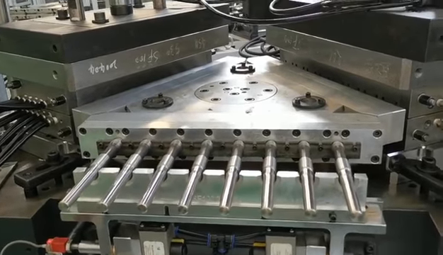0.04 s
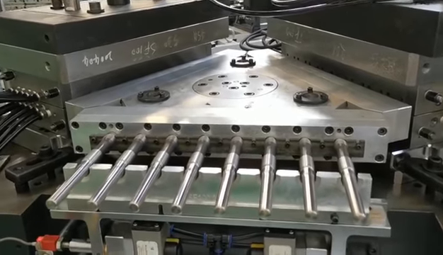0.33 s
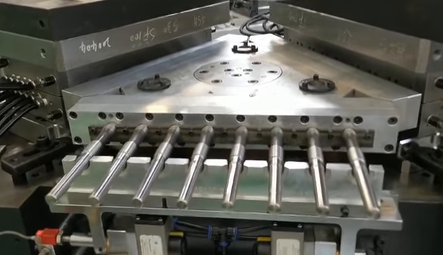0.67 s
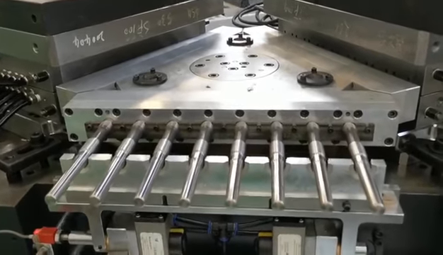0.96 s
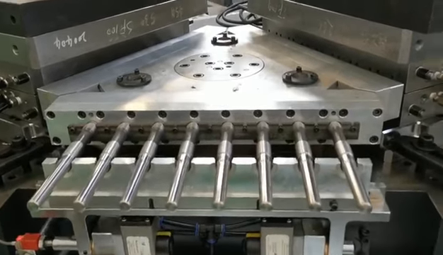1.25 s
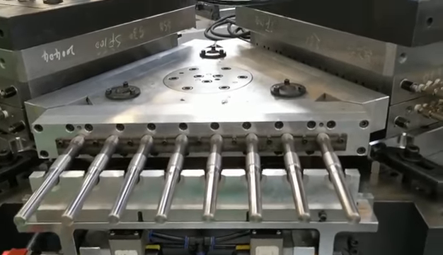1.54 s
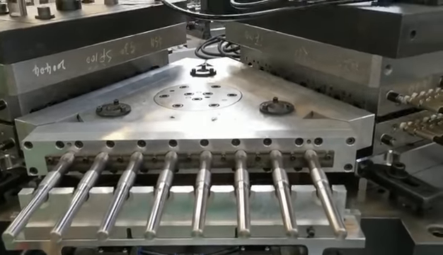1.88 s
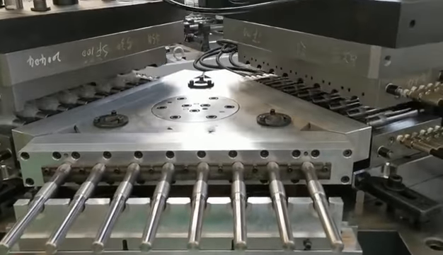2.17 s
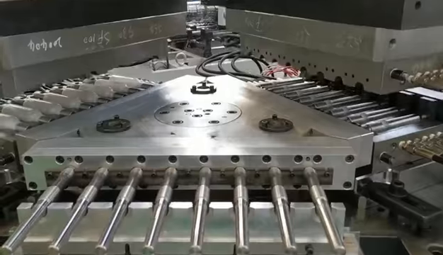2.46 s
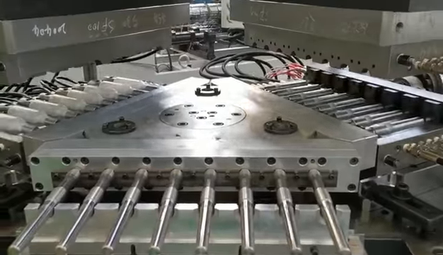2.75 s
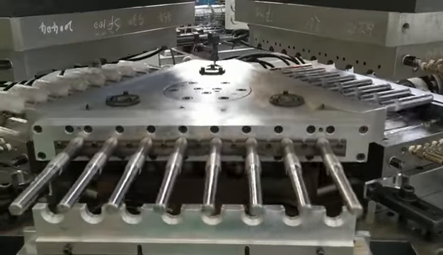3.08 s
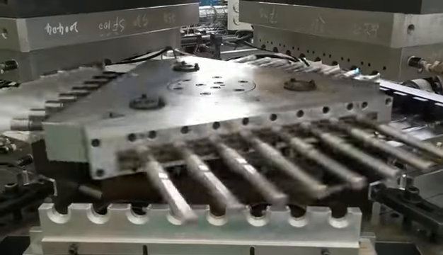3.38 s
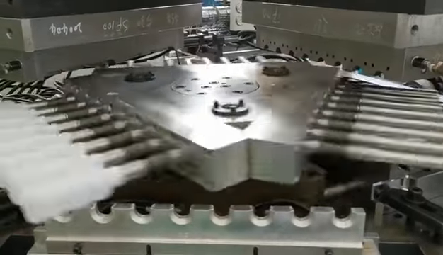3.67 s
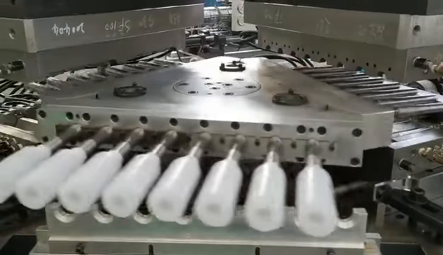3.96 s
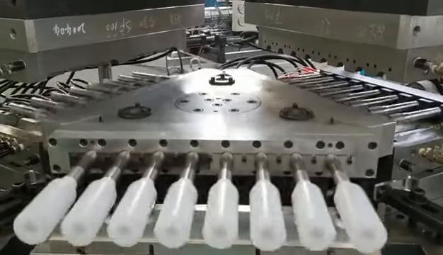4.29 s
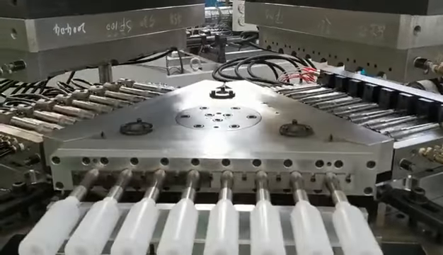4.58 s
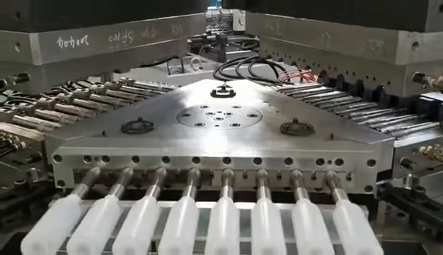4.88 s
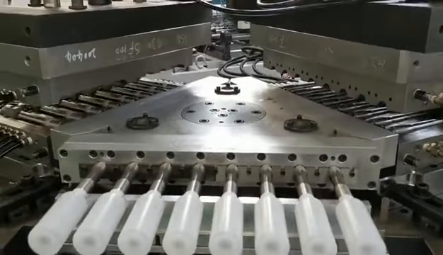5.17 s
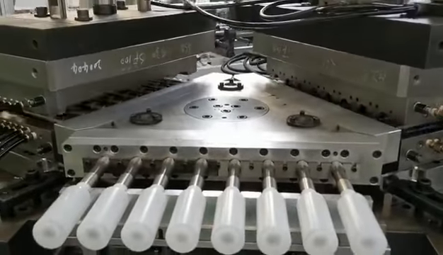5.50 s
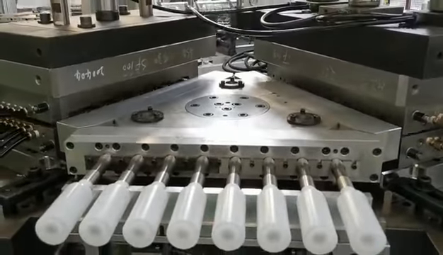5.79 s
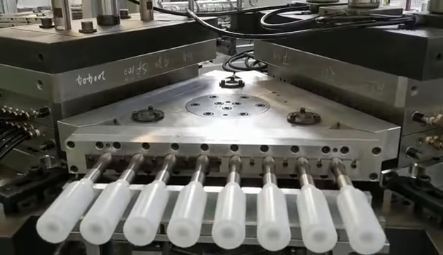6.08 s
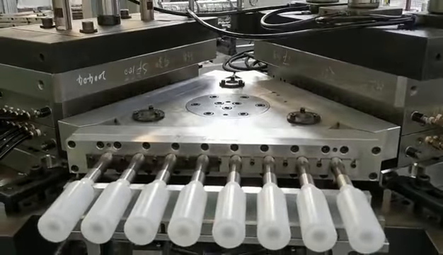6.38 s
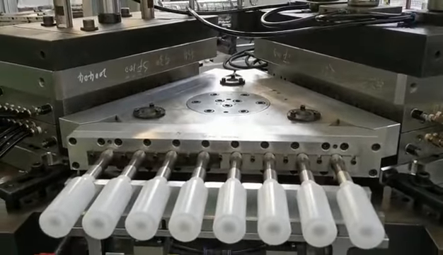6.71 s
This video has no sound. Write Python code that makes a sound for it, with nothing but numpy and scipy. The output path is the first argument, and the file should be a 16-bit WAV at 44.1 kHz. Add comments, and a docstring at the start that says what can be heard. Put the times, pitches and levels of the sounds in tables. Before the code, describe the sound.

A plastic bottle molding machine runs one cycle, heard up close in an echoing factory hall. A hydraulic pump hums under a short hiss, then the molds part with dull, juddering thuds. A loud, high burst of compressed air follows, and a steel turret turns with rattles and knocks before landing with a clunk. Near the end the molds clang shut, ringing briefly, over the steady drone of other machines.

```python
"""Factory floor: an injection blow moulding machine runs one cycle.
The moulds part with dull thuds, valves dump compressed air, and the turret turns and drops onto its seat.
The moulds clang shut and set the steel frame ringing. Latches click and loose tooling rattles.
The hydraulic pump hums under load; behind it are distant machines, motors, leaks and the hall's echo."""
import sys
import numpy as np
from scipy import signal
from scipy.fft import rfft, irfft, next_fast_len
from scipy.io import wavfile

SR = 44100
rng = np.random.default_rng(int(sys.argv[2]) if len(sys.argv) > 2 else 0)


def generate_wav(signal):
    """Clip the signal to [-1, 1] and save it as 16-bit WAV at the path in sys.argv[1]."""
    frames = np.transpose(np.atleast_2d(signal))
    scaled = np.clip(frames, -1, 1) * 32767
    pcm = np.round(scaled).astype(np.int16)
    wavfile.write(sys.argv[1], SR, pcm)


N = 297234
TIME = np.arange(N) / SR
NOISE_TOP_HZ = 7560


# start_s, level_db, bright_hz, pan_db, frame_share, knock_hz, knock_db, t60_scale
STEEL_LANDINGS = [(1.906, -20, 700, -6, 0, 330, -8, 0.82), (2.955, -28, 700, 1, 0.12, 726, 0.5, 0.76),
                  (3.272, -25, 1500, 0.5, 0.12, 298, 1, 1.2), (3.336, -29.5, 2500, 4, 0, 393, -7, 2.2),
                  (4.273, -30, 1400, -5, 0.2, 494, 0, 3), (4.286, -25, 1400, -5, 0.15, 920, -2, 1.5),
                  (4.418, -26, 3000, 0, 0.07, 1110, -8, 1.3), (4.6343, -15, 1600, -2, 0.22, 629, 2, 1.02),
                  (5.9535, -15.5, 885, -3, 0.46, 603, -1, 1.94),
                  (6.0204, -9.5, 4200, -2.5, 0.3, 1263, -8, 0.76),
                  (6.039, -17.5, 1200, 6, 0.2, 332, 5.5, 1.7),
                  (6.197, -19.5, 2100, -1, 0.69, 522, 0.5, 1.6)]
# pitch_ratio, level_db, t60_scale
KNOCK_MODES = [(1, 1.5, 1), (1.48, -7, .8), (2.3, -14.5, 0.61)]
# freq_hz, density_db
TOOLING_SPECTRUM = [(60, -19.5), (150, -4), (350, 1), (750, 0.5), (950, -11.5), (1250, -4), (1700, -12),
                    (2900, -8.5), (4200, -18), (7500, -22.5)]
# freq_hz, t60_s
TOOLING_DECAY = [(100, 0.29), (400, 0.25), (1000, 0.15), (2200, 0.19), (4000, 0.11), (7500, 0.2)]
# pitch_hz, level_db, t60_s
FRAME_MODES = [(119.3, -27, 1), (223, -30, 0.82), (246.7, -10, 0.3), (294.7, -11, 0.93), (314, -27, 0.87),
               (341, -5, 0.49), (364, -21, 0.86), (415, -21, 0.87), (421.8, -7.5, 0.82), (522, -5, 0.46),
               (615, -12, 0.55), (636, -2.5, 0.35), (768, -15.5, 1), (1050, -21, 0.95), (1145, -17, 0.5),
               (1360, -31.5, 0.18), (1450, -18.5, 0.16), (1960, -34, 0.23), (1875, -25.5, 0.46),
               (1820, -22, .3), (2360, -19, .35), (2450, -19, 0.37), (2600, -30, .3), (2530, -22.5, 0.23),
               (2960, -33, 0.11), (4400, -25.5, 0.29)]

def clunks(ring_db=-2, knock_t60_s=0.054):
    """Steel on steel: a solid knock, a crash of dense tooling modes, a ringing frame."""
    out = np.zeros((2, N))
    edges_hz = np.geomspace(60, 9000, 8)
    for start_s, db, bright_hz, pan_db, frame_share, knock_hz, knock_db, t60_scale in landings():
        knock = sum(from_db(knock_db + mode_db) * mode(knock_hz * ratio, knock_t60_s * scale, 0.22)
                    for ratio, mode_db, scale in KNOCK_MODES)
        dense = rms_one(filtered(noise(TOOLING_SPECTRUM, size=SR), bright_hz, "low", order=1))
        crash = np.zeros((2, SR))
        for low_hz, high_hz in zip(edges_hz, edges_hz[1:]):
            band_t60_s = t60_scale * at_hz(TOOLING_DECAY, np.sqrt(low_hz * high_hz))
            crash += filtered(dense, [low_hz, high_hz], "band") * decay(band_t60_s)
        ring = np.zeros((2, SR))
        for hz, mode_db, t60_s in FRAME_MODES:
            gain = from_db(mode_db + 0.42 * rng.normal()) * rng.choice([-1, 1])
            ring += gain * mode(hz, t60_s, skew_rad=0.25)
        blow = (knock + crash) * panned(pan_db) + from_db(ring_db) * frame_share * ring
        add(out, start_s, from_db(db) * blow)
    return out


def landings(settle_s=0.01, settle_db=-10, pitch_ratio=0.6):
    """Each part lands, then settles with a softer, lower knock."""
    for start_s, db, bright_hz, pan_db, share, knock_hz, knock_db, t60_scale in STEEL_LANDINGS:
        for delay_s, drop_db, ratio in ((0, 0, 1), (settle_s, settle_db, pitch_ratio)):
            yield (start_s + delay_s, db + drop_db, bright_hz, pan_db, share,
                   knock_hz * ratio, knock_db, t60_scale)


# freq_hz, density_db
SILENCER_SPECTRUM = [(1200, -34.5), (2000, -16.5), (2700, -12.5), (3600, -2.5), (4450, -4), (4750, -12),
                     (5450, -11.5), (5800, -17), (7500, -18)]
# pitch_hz, width_hz, level_db
SILENCER_CAVITY = [(4456, 150, 8), (3930, 300, -11), (2860, 21, -14)]

def turret_exhaust():
    """Air dumps as the turret starts; the silencer cavity gives it a pitch."""
    jet = noise(SILENCER_SPECTRUM)
    cavity = sum(from_db(db) * resonance(jet, hz, width_hz) for hz, width_hz, db in SILENCER_CAVITY)
    flow = air_dump(peak_s=2.977, rise_s=0.13, burst_db=-20, flow_db=-30.5, hold_s=0.37, t60_s=2.5)
    return rms_one(jet + cavity) * flow * from_db(0.45 * drift(30)) * panned(-9.5)


# freq_hz, density_db
VENT_SPECTRUM = [(700, -19.5), (1500, -7), (2400, -1), (3400, -1), (4300, -2.5), (5550, 5.5), (5900, -4),
                 (7500, -5)]

def mould_exhaust():
    """Compressed air hisses out of the moulds."""
    flow = air_dump(peak_s=0.063, rise_s=3, burst_db=-26, flow_db=-37, hold_s=0.2, t60_s=1.5)
    return noise(VENT_SPECTRUM) * flow * from_db(0.25 * drift(30)) * panned(-5)


def air_dump(peak_s, rise_s, burst_db, flow_db, hold_s, t60_s):
    """Valve envelope: a brief overpressure on a flow that fades as the line empties."""
    burst = from_db(burst_db) * swell(peak_s, rise_s=0.035, hold_s=0, t60_s=0.19)
    return burst + from_db(flow_db) * swell(peak_s, rise_s, hold_s, t60_s)


# start_s, level_db, rise_s, t60_s, pan_db
VALVE_PUFFS = [(0.777, -23, 0.0032, 0.091, -3), (1.906, -33, 0.0041, 0.49, -8),
               (1.929, -28.5, 0.006, 0.071, -5), (3.268, -31.5, 0.0056, 0.28, -3),
               (4.262, -36, 0.011, 0.2, -11.5), (4.415, -25, 0.011, 0.15, -4),
               (4.631, -25.5, 0.0051, 0.074, -3), (5.94, -32, 0.019, 0.16, -7.5)]
# freq_hz, density_db
PUFF_SPECTRUM = [(300, 3.5), (900, 10.5), (2000, 7.5), (4000, 7.5), (5400, 3), (5900, -4), (7500, -1)]

def valve_puffs():
    """Valves release short puffs of air."""
    out = np.zeros((2, N))
    for start_s, db, rise_s, t60_s, pan_db in VALVE_PUFFS:
        fall = np.minimum(decay(t60_s) * from_db(60 * rise_s / t60_s), 1)
        puff = attack(rise_s) * fall * noise(PUFF_SPECTRUM, size=SR)
        add(out, start_s, from_db(db) * puff * panned(pan_db))
    return out


# start_s, level_db, pitch_hz, t60_s
HEAVY_THUDS = [(0.055, -23, 67.5, 0.15), (1.59, -23, 135, 0.47), (1.629, -26, 70.4, 0.41),
               (1.984, -24, 61.4, 0.6), (3.268, -28, 151.4, 0.5), (4.288, -26.5, 163.4, 0.19),
               (4.72, -28.5, 130.7, 0.57), (5.566, -28.5, 74.5, 0.4), (5.955, -22, 140, 0.33)]

def thuds(rumble_db=-9, rumble_hz=330, rise_s=0.0039):
    """Soft blows of heavy parts: one damped mode plus low rumble."""
    out = np.zeros((2, N))
    for start_s, db, hz, t60_s in HEAVY_THUDS + judders():
        rumble = rms_one(filtered(noise(OIL_SPECTRUM, size=SR), rumble_hz, "low")) * decay(t60_s)
        body = mode(hz, t60_s, skew_rad=0.81) + from_db(rumble_db) * rumble
        add(out, start_s, from_db(db) * body * attack(rise_s))
    return out


# start_s, level_db, pitch_hz, t60_s, thud_count, loss_per_thud_db
JUDDER_RUNS = [(1.876, -15.5, 132.3, 0.15, 6, 0.1), (2.888, -8, 141, 0.089, 4, 2.5)]

def judders(gap_s=0.0262, pitch_spread=0.07):
    """Stick-slip as a part breaks free: rows for an even run of weakening thuds."""
    return [(start_s + k * gap_s, db - k * loss_db, hz * (1 + pitch_spread * rng.normal()), t60_s)
            for start_s, db, hz, t60_s, count, loss_db in JUDDER_RUNS for k in range(count)]


# start_s, end_s, load_ratio
PUMP_STROKES = [(-0.4, 0.189, 1.2), (0.134, 1.503, 0.95), (5.867, 6.904, 0.85)]
# harmonic, no_load_db, load_gain_db
PUMP_TONES = [(2, -48.5, 6.5), (3, -65.5, 5.5), (4, -59, 6.5), (5, -58, 9.5), (6, -57, 12.5), (7, -68, 6),
              (8, -58.5, 10), (9, -54.5, 3), (11, -64, 10.5), (12, -63, 14.5), (14, -58.5, 8)]
# freq_hz, density_db
OIL_SPECTRUM = [(25, -3.5), (60, -7), (110, -1), (190, 2.5), (300, -5.5), (600, -6.5), (720, -12),
                (1000, -13), (1350, -12.5), (1600, -22), (2900, -22.5), (5000, -22.5), (7500, -30.5)]

def pump(no_load_hz=99.5, sag=0.008, idle_load=0.0595, rise_s=0.26, fall_s=0.234):
    """Load slows the pistons slightly, raises the hum and drives oil through the valves."""
    strokes = sum(peak * np.clip(np.minimum((TIME - start_s) / rise_s, (end_s - TIME) / fall_s), 0, 1)
                  for start_s, end_s, peak in PUMP_STROKES)
    load = np.maximum(strokes, idle_load)
    piston_hz = no_load_hz * (1 - sag * load)
    hum = sum(from_db(db + load * load_db) * tone(k * piston_hz) for k, db, load_db in PUMP_TONES)
    oil = from_db(-38 + 1.3 * drift(3.3)) * load * noise(OIL_SPECTRUM, lead_s=-0.00014)
    return hum * panned(-4 * (1 - load)) + oil * panned(-2)


# start_s, level_db, pitch_hz, t60_s, pan_db
LATCH_CLICKS = [(0.781, -31, 4040, 0.028, 0), (1.284, -30, 4050, 0.03, -3), (1.809, -32, 4030, 0.031, -9),
                (1.9385, -26, 5260, 0.04, -22), (1.968, -33, 3320, 0.035, -13),
                (2.058, -25.5, 2030, 0.06, -14), (2.117, -28.5, 2930, 0.025, -18),
                (2.18, -28, 4040, 0.027, -19), (2.783, -30, 2090, 0.031, -10),
                (3.338, -31, 2064, 0.035, -2), (3.764, -30, 2160, 0.022, -17),
                (4.875, -17.5, 3706, 0.042, -10), (6.021, -18.5, 3850, 0.019, -11),
                (6.195, -22, 2880, 0.05, -12)]
# pitch_ratio, level_db, t60_scale
PIN_MODES = [(.62, -20.5, 2.1), (0.709, -34, 0.8), (1, 2.5, 1.1), (1.05, -12.5, 0.91), (1.27, -10, 0.64),
             (1.33, -6, 0.17), (1.43, -27, 0.99), (1.85, -15, 0.59), (2.172, -13, 0.42)]

def clicks(ring_db=-5.5, crack_db=-10, crack_t60_s=0.05, rebound_s=0.006, rebound_db=-5):
    """Pins and latches snap home and rebound once: a crack plus bright modes."""
    out = np.zeros((2, N))
    for start_s, db, hz, t60_s, pan_db in LATCH_CLICKS:
        for delay_s, contact_db in ((0, 0), (rebound_s * rng.uniform(1, 1.3), rebound_db)):
            ring = sum(from_db(ring_db + mode_db) * mode(hz * ratio, t60_s * scale, skew_rad=0.27)
                       for ratio, mode_db, scale in PIN_MODES)
            crack = from_db(crack_db) * noise(PUFF_SPECTRUM, size=SR) * decay(crack_t60_s)
            add(out, start_s + delay_s, from_db(db + contact_db) * (ring + crack) * panned(pan_db))
    return out


# peak_s, hold_s, level_db
TRAVEL_SPANS = [(1.945, 0.12, -36), (3.342, 0.06, -42.5), (3.5, 0.7, -50), (4.22, 0.08, -47),
                (4.644, 0.02, -46.5), (6.035, 0.067, -30), (6.2, 0.55, -41.5)]

def rattle(contacts_per_s=60, spread_db=4):
    """Three loose tooling parts chatter while a heavy part travels."""
    chatter = np.zeros((2, N))
    for _ in range(3):
        hits = rng.random(N) < contacts_per_s / SR
        contacts = hits * from_db(spread_db * rng.standard_normal(N)) * rng.choice([-1, 1], N)
        body = noise(TOOLING_SPECTRUM, size=SR) * decay(t60_s=0.13)
        chatter += signal.fftconvolve(contacts[None], body, axes=1)[:, :N]
    shaking = np.max([from_db(db) * swell(peak_s, rise_s=0.46, hold_s=hold_s, t60_s=0.59)
                      for peak_s, hold_s, db in TRAVEL_SPANS], axis=0)
    return rms_one(filtered(chatter, NOISE_TOP_HZ, "low", order=16)) * shaking * panned(-4)


# time_s, gain_db
BACKGROUND_GAIN = [(0, -6.5), (1.3, -7), (1.7, -4.5), (3.2, -3.5), (3.9, -1), (6.74, 0)]
# freq_hz, density_db
DIN_SPECTRUM = [(22, -20.5), (48, -7.5), (100, -7.5), (140, -5.5), (200, -4), (255, -8), (320, -3.5),
                (410, -9), (460, -10.5), (560, -6), (720, -16.5), (950, -11), (1450, -18.5), (2000, -22),
                (4000, -56)]
# freq_hz, pan_db
DIN_PAN = [(60, -2.5), (180, -3), (310, -8), (900, -4.5), (1600, -11), (2700, -1), (7000, -14.5)]
# pitch_hz, level_db
MOTOR_TONES = [(59.6, -51.5), (119.4, -47.5), (301.3, -42), (339, -49), (399, -45.5), (420, -54.5),
               (502, -44), (829, -48.5), (1168, -50.5), (1315, -83), (1497, -55.5), (1597, -57.5),
               (2880, -60.5), (2941, -55.5)]
# freq_hz, density_db
LEAK_SPECTRUM = [(900, -8.5), (1900, -3), (2800, 3.5), (3200, -1.5), (3600, 2), (4400, 0.5), (5400, -3.5),
                 (7400, -7.5)]

def factory():
    """The background din and motor hum rise in level; fittings leak air steadily."""
    gain_db = in_time(BACKGROUND_GAIN)
    din = noise(DIN_SPECTRUM, pan=DIN_PAN, lead_s=0.00011)
    din *= from_db(-35.5 + gain_db + 0.5 * drift(6.1))
    motors = sum(from_db(db) * tone(hz, waver=0.001956) for hz, db in MOTOR_TONES)
    motors *= from_db(-0.07 + 1.19 * gain_db)
    leak = noise(LEAK_SPECTRUM, lead_s=0.0003) * from_db(-44.5 + 0.66 * drift(11))
    return din + motors * panned(-2.5) + leak * panned(-11.5)


# time_s, gain_db
MIDRANGE_GAIN = [(2.985, 5), (3.015, -18), (3.25, -6), (3.28, -2)]

def midrange_dip(machinery):
    """The midrange starts boosted, dips briefly and partly recovers."""
    midrange = filtered(machinery, [130, 2400], "band", order=1)
    return machinery + midrange * (from_db(in_time(MIDRANGE_GAIN)) - 1)


# freq_hz, density_db
HALL_SPECTRUM = [(80, -13), (400, 7), (900, -11.5), (2500, 1.5), (7500, -20.5)]

def hall(x, t60_s=1.83):
    """Diffuse hall echo builds and fades."""
    echo = noise(HALL_SPECTRUM, size=SR) * decay(t60_s) * attack(rise_s=0.026)
    return signal.fftconvolve(x, rms_one(echo) / np.sqrt(SR), axes=1)[:, :N]


# freq_hz, coherence
STEREO_COHERENCE = [(60, 1), (170, 1), (300, 1), (600, 0.82), (1100, 0.14), (2200, 0.06), (7000, 0.01)]

def noise(spectrum, size=N, pan=((100, 0), (1000, 0)), lead_s=0):
    """Shaped stereo noise at unit rms, coherent in the bass; left leads by lead_s."""
    padded = next_fast_len(size, True)
    hz = np.fft.rfftfreq(padded, 1 / SR)
    mid, side = rfft(rng.standard_normal((2, padded)))
    coherence = np.clip(at_hz(STEREO_COHERENCE, hz), 0, 1)
    pair = np.sqrt(1 + coherence) * mid + np.sqrt(1 - coherence) * side * [[1], [-1]]
    pair[0] *= np.exp(2j * np.pi * hz * lead_s)
    passband = (hz > 15) & (hz < NOISE_TOP_HZ)
    pair *= passband * from_db(at_hz(spectrum, hz)) * panned(at_hz(pan, hz))
    return rms_one(irfft(pair, padded)[:, :size])


def tone(hz, waver=0.00285, flutter_db=2.5):
    """Machine tone, wavering in pitch and level."""
    phase = 2 * np.pi * np.cumsum(hz * (1 + waver * drift(3.85))) / SR
    coherence = np.clip(at_hz(STEREO_COHERENCE, np.mean(hz)), 0, 1)
    skew = np.arccos(coherence) / 2 * rng.choice([-1, 1])
    return np.sqrt(2) * np.sin(phase + [[skew], [-skew]]) * from_db(flutter_db * (drift(1.5) - 1))


def mode(hz, t60_s, skew_rad):
    """Struck mode; random left-right phase skew grows with pitch up to 1 kHz."""
    skew = rng.normal() * skew_rad * min(hz / 1000, 1) * np.array([[1], [-1]])
    return np.sin(2 * np.pi * hz * TIME[:SR] + skew) * decay(t60_s)


def drift(rate_hz):
    """Slow random curve, rms about 1."""
    step = 100
    pole = np.exp(-2 * np.pi * step * rate_hz / SR)
    white = rng.standard_normal(N // step + 1002)
    slow = signal.lfilter([1], [1, -2 * pole, pole * pole], white)[1000:]
    return np.interp(np.arange(N) / step, np.arange(len(slow)), rms_one(slow))


def swell(peak_s, rise_s, hold_s, t60_s):
    """Climb 60 dB to peak_s, hold, decay."""
    below_peak_db = 60 * np.maximum((peak_s - TIME) / rise_s, (TIME - peak_s - hold_s) / t60_s)
    return from_db(-np.maximum(below_peak_db, 0))


def attack(rise_s):
    return np.minimum(TIME[:SR] / rise_s, 1)


def decay(t60_s):
    return from_db(-60 * TIME[:SR] / t60_s)


def filtered(x, hz, kind, order=2):
    return signal.sosfilt(signal.butter(order, hz, kind, fs=SR, output="sos"), x)


def resonance(x, hz, width_hz):
    return signal.lfilter(*signal.iirpeak(hz, hz / width_hz, SR), x)


def panned(pan_db):
    """Constant-power gains; positive is left."""
    pair = from_db(np.array([[1], [-1]]) * pan_db / 2)
    return pair / np.sqrt(np.mean(pair ** 2, axis=0))


def at_hz(points, hz):
    """Table lookup on a log-frequency axis."""
    known_hz, values = np.transpose(points)
    return np.interp(np.log(np.maximum(hz, 1)), np.log(known_hz), values)


def in_time(rows):
    return np.interp(TIME, *np.transpose(rows))


def from_db(db):
    return 10 ** (np.asarray(db) / 20)


def rms_one(x):
    return x / np.sqrt(np.mean(x ** 2) + 1e-20)


def add(out, start_s, sound):
    start = round(start_s * SR)
    out[:, start:start + sound.shape[-1]] += sound[..., :N - start]


def scene():
    """Blows and air over steady machinery; only the steel blows echo."""
    machinery = midrange_dip(factory() + pump())
    steel = clunks()
    air = turret_exhaust() + mould_exhaust() + valve_puffs()
    return steel + air + thuds() + clicks() + rattle() + machinery + from_db(-17) * hall(steel)


def record(dry, notch_depth=0.48, cutoff_hz=8500):
    """Microphone port notch, then a steep low-pass."""
    notched = dry - notch_depth * resonance(dry, hz=5950, width_hz=650)
    return signal.sosfilt(signal.ellip(12, 0.2, 80, cutoff_hz, fs=SR, output="sos"), notched)


dry = scene()
out = record(dry)
generate_wav(out)
```